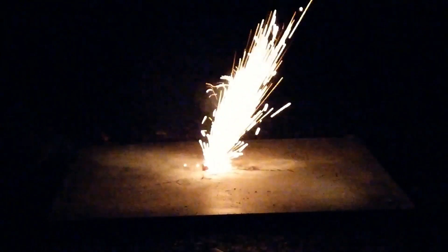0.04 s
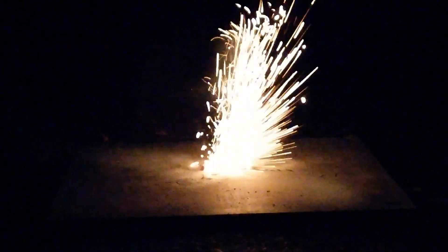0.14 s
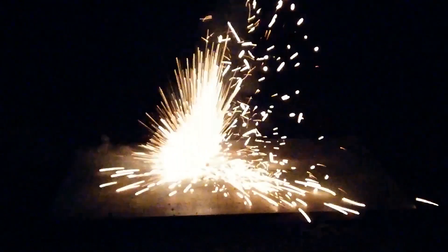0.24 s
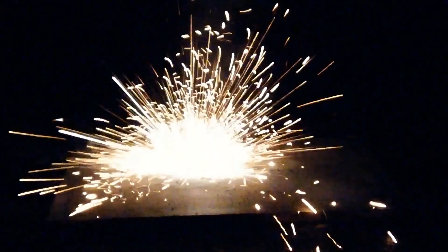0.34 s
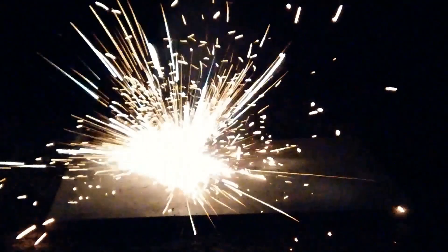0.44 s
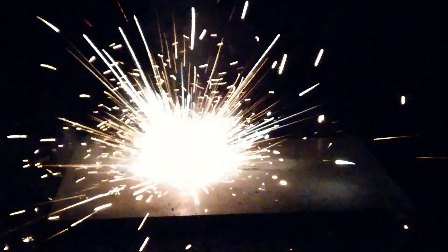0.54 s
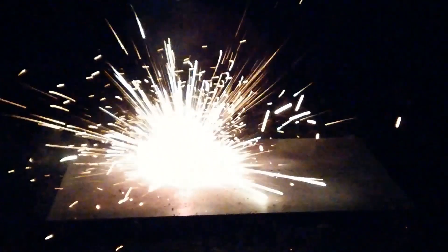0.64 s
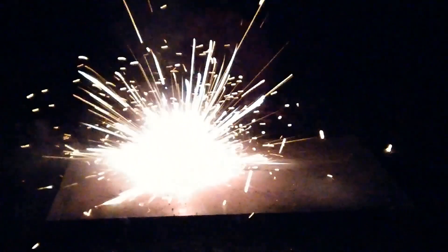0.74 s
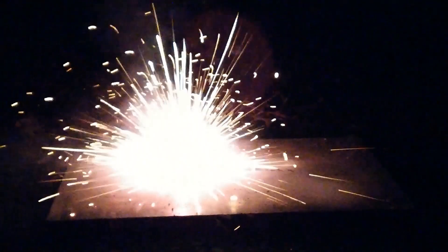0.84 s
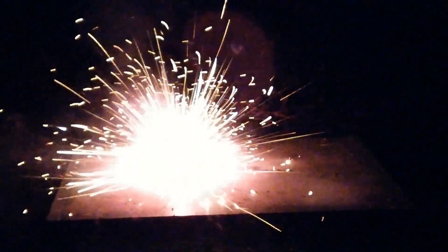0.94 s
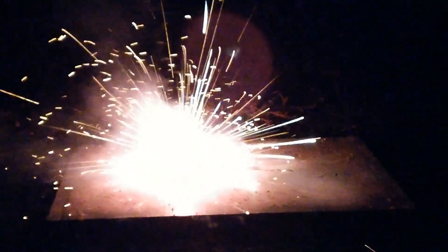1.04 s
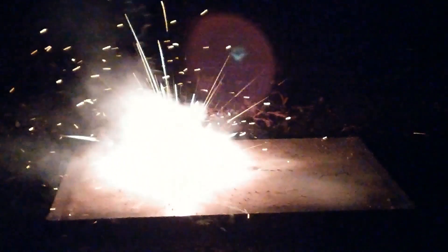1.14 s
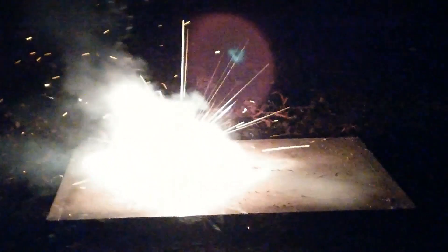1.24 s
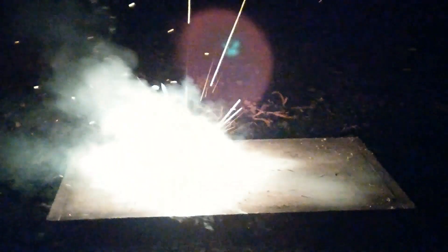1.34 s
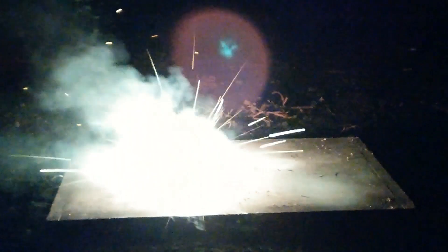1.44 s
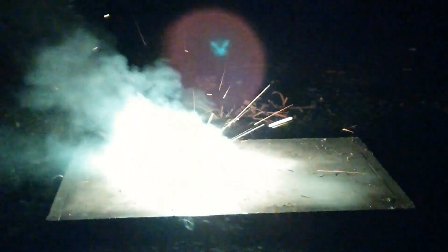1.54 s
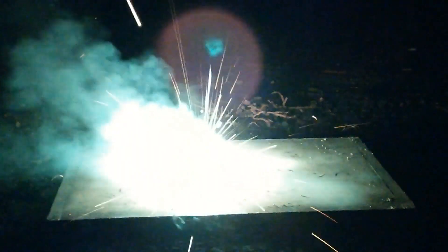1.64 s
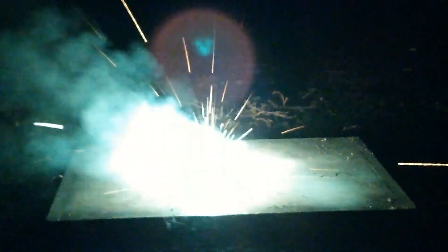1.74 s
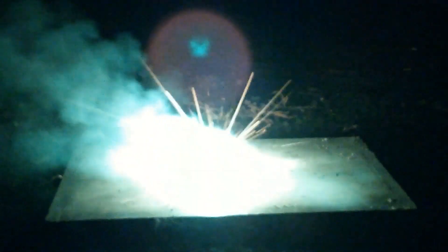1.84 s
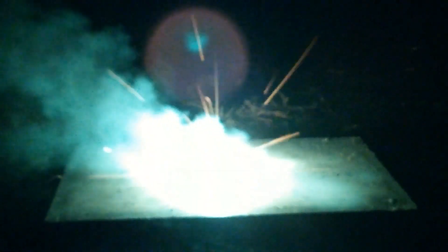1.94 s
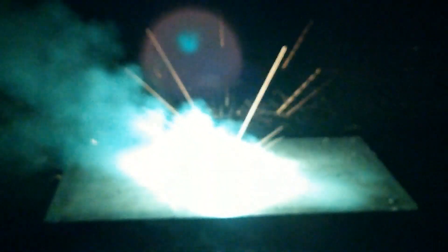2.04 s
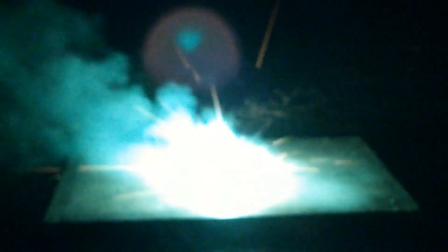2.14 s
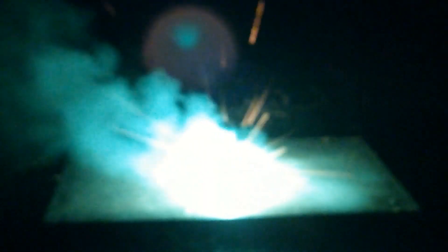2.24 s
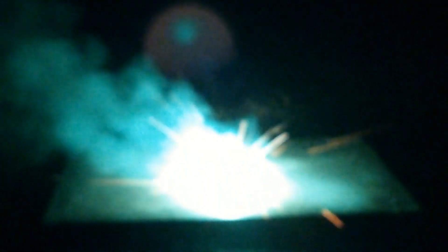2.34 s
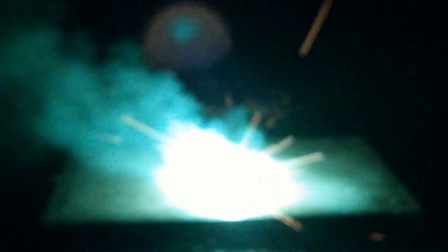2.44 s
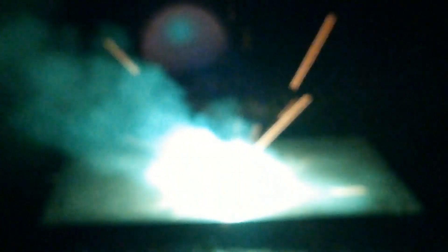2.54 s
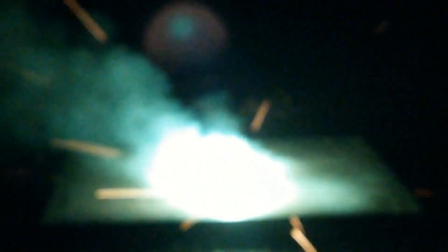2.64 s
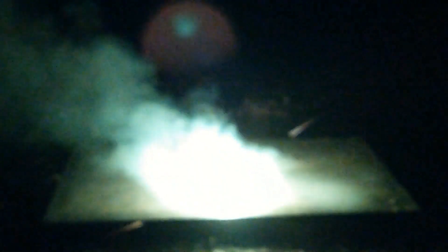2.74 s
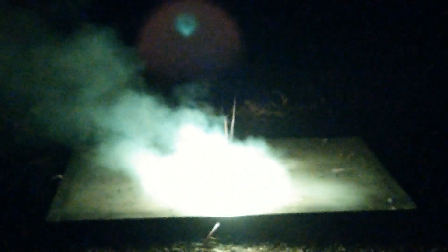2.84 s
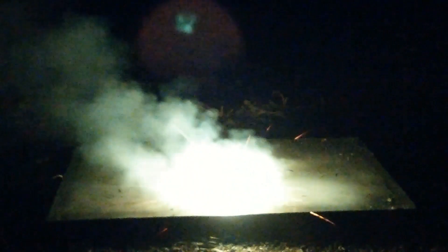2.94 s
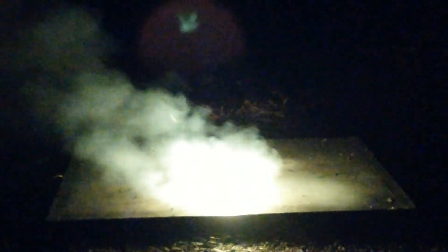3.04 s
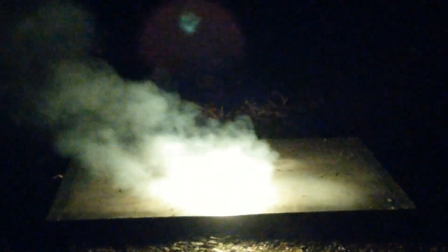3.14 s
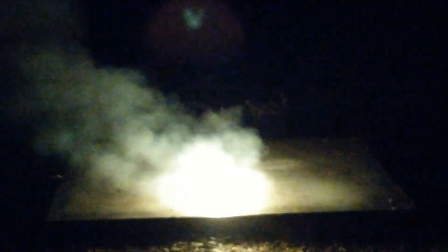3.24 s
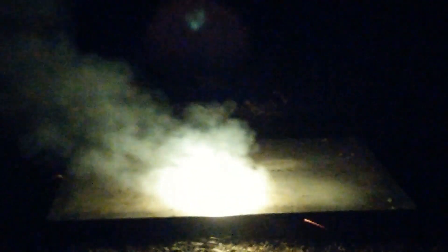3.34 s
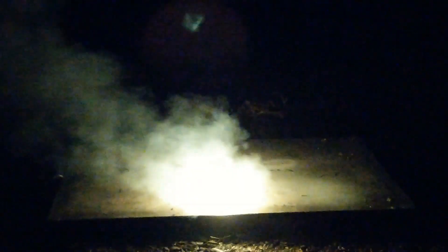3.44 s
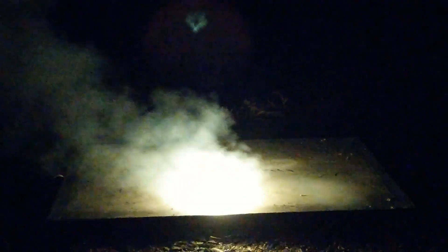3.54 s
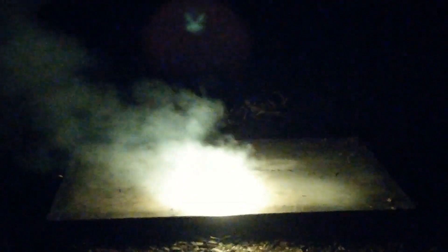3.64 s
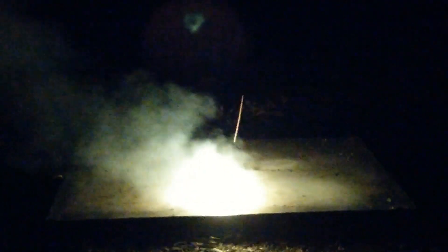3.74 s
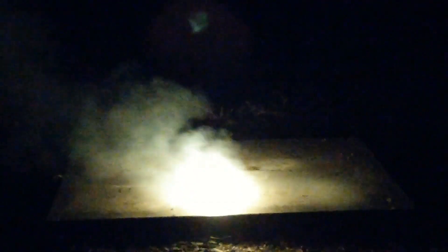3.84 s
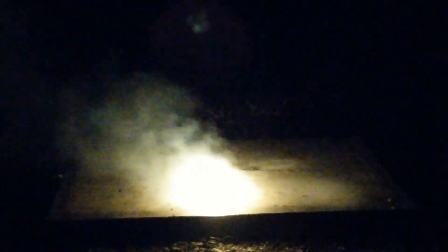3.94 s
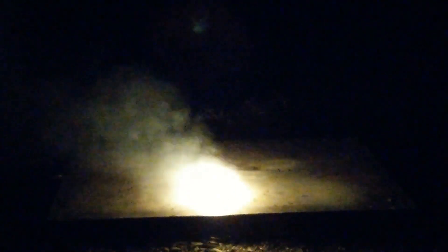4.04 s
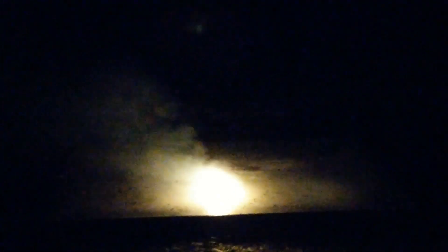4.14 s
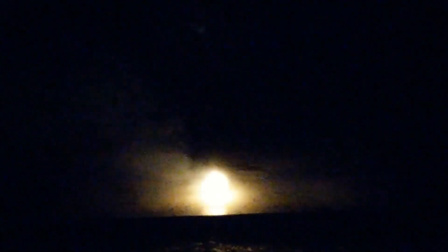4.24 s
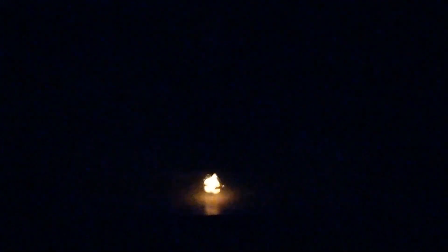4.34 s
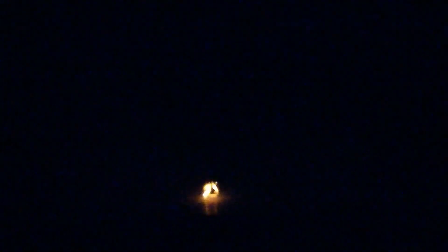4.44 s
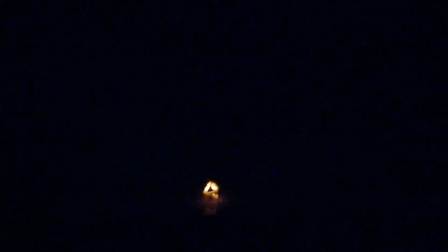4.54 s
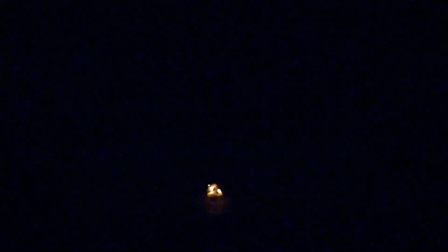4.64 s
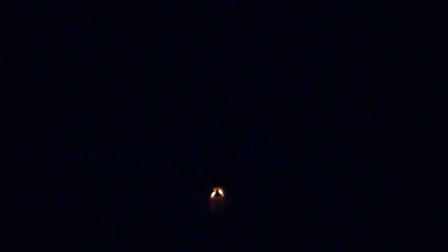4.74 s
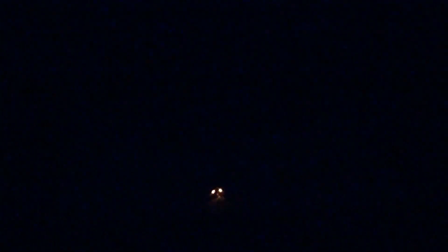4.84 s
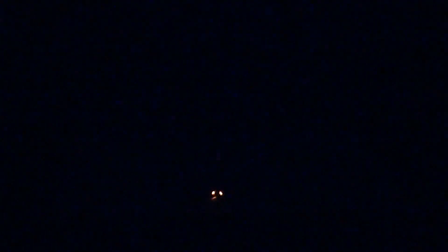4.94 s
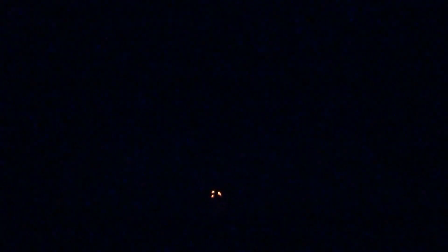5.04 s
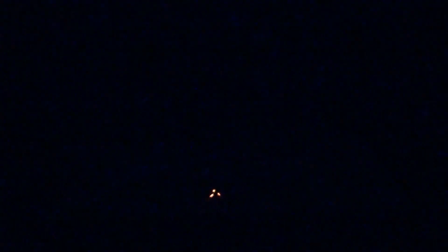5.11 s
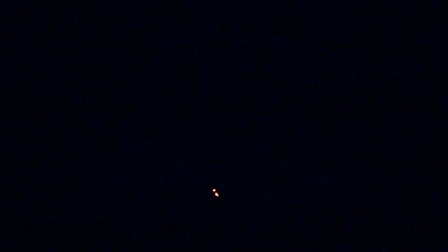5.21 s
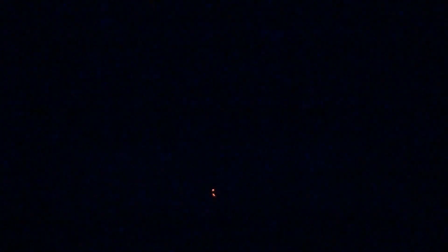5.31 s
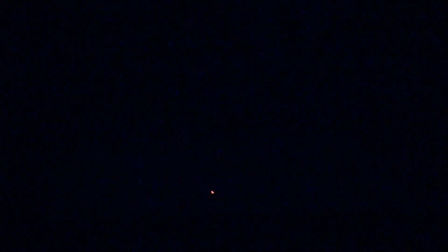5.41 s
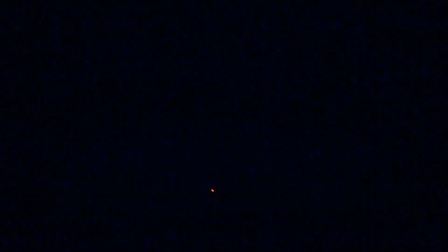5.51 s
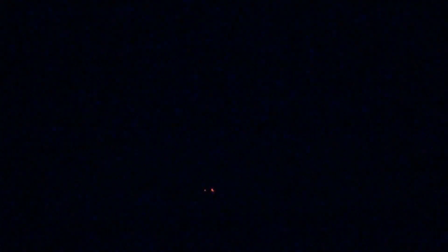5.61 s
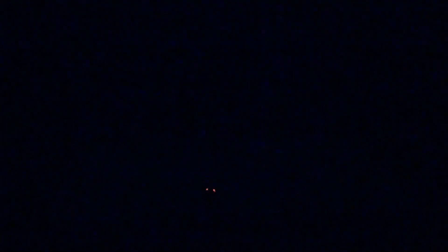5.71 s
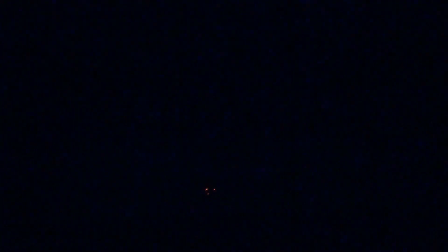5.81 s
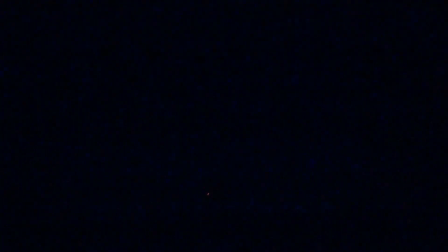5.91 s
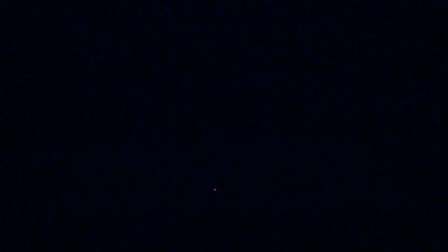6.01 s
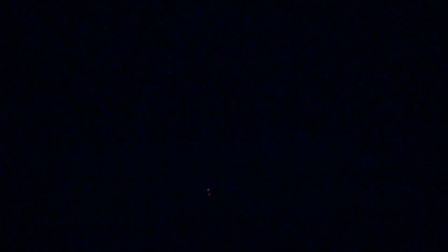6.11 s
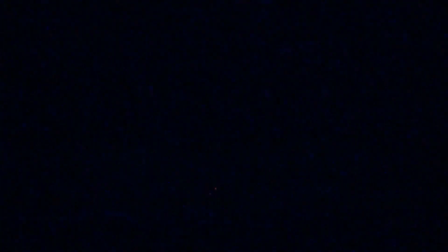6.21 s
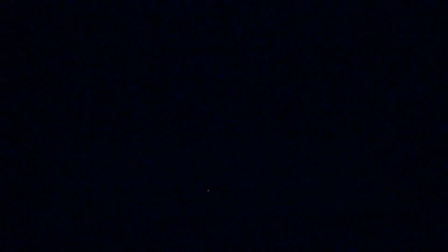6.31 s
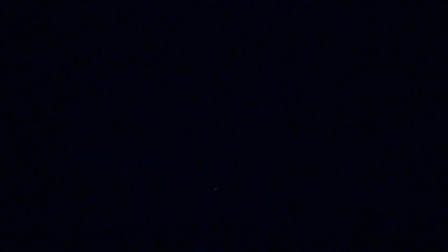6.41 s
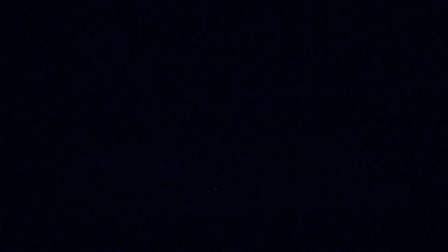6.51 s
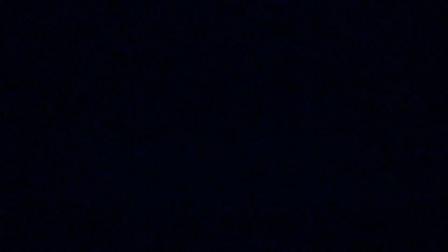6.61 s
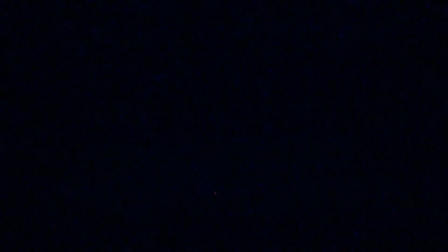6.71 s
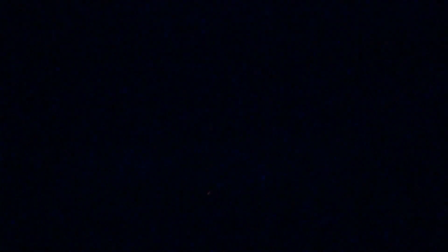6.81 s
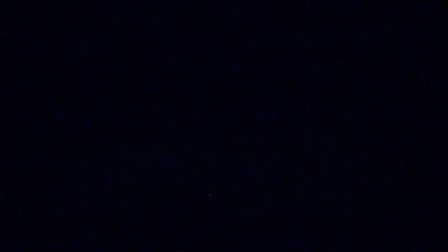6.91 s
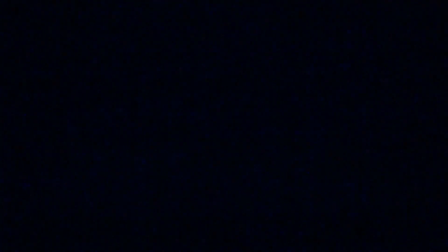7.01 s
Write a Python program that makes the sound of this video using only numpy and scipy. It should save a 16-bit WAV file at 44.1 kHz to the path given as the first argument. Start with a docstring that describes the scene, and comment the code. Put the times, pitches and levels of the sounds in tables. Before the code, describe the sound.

Harsh, bright firework hiss with a buzzing spin underneath burns briefly, cuts off, and leaves quick clicking taps on thin board in quiet night.

```python
"""Ground spinner firework on a board

Jets hiss and spit as a case on a thin board spins up outdoors at night: shaped, beating noise.
It hums at multiples of its turning rate (sines); after the flame the empty case keeps turning, taps
(noise clicks, decaying board modes) and rubs (noise through those modes).
Low rumble of changing level and microphone hiss lie under it, as shaped noise."""
import sys
import numpy as np
from scipy.fft import rfft, irfft, next_fast_len
from scipy.io import wavfile
from scipy.ndimage import map_coordinates

SR = 44100
rng = np.random.default_rng(int(sys.argv[2]) if len(sys.argv) > 2 else 0)


def put_to_file(sound):
    """Save the sound as 16-bit audio at rate SR, in the file named by the first command-line argument."""
    columns = np.atleast_2d(sound).T  # one column per channel
    safe = np.clip(columns, -1, 1)
    whole_steps = np.round(safe * 32767)
    wavfile.write(sys.argv[1], SR, whole_steps.astype(np.int16))


N = 311742

# turning case: t/s, rate/(turns/s), even-spin hum level/dB
SPIN = [(0.6, 17.6, -51), (0.83, 30.7, -38), (1.0, 41.5, -37), (1.17, 50.5, -33), (1.27, 54.9, -33),
        (1.4, 56.9, -33.5), (1.61, 58.1, -35), (1.94, 58.5, -33), (2.3, 56, -35), (2.73, 52, -35),
        (3.1, 47.4, -37), (3.5, 42.6, -41), (3.78, 39.8, -44), (4.09, 36.4, -46), (4.3, 35, -51),
        (4.47, 30, -64), (5.2, 25, -92)]
# lower board modes: f/Hz, relative level/dB, t60/s
BOARD_LOW_MODES = [(348, -5, 0.045), (594, -2, 0.09), (629.5, 8, 0.035), (800, 7, 0.042), (980, 3, 0.055),
                   (1250, 0, 0.06)]


def amp(db):
    """Gain of a level in dB."""
    return 10 ** (np.asarray(db) / 20)


def unit(x):
    """x scaled to rms 1."""
    return x / np.sqrt(np.mean(x ** 2) + 1e-20)


def along(points, hz):
    """(f/Hz, value) points interpolated on a log frequency axis."""
    f, v = np.transpose(points)
    return np.interp(np.log(hz + 1), np.log(f + 1), v)


def curves(rows):
    """One value per sample for each column after the time."""
    s, *cols = np.transpose(rows)
    return [np.interp(np.arange(N) / SR, s, c) for c in cols]


def bumps(rows):
    """Sum in dB of Gaussian swells and dips: t/s, rise/dB, length/s."""
    t = np.arange(N) / SR
    return sum(db * np.exp(-((t - s) / length_s) ** 2) for s, db, length_s in rows)


def wander(knots_hz):
    """Smooth random curve through normal knots at a given rate."""
    knots = rng.standard_normal(int(N * knots_hz / SR) + 4)
    return map_coordinates(knots, [np.arange(N) * knots_hz / SR])


def filtered(x, response):
    """x through a complex response of frequency, zero-padded."""
    m = next_fast_len(N + SR // 4)
    return irfft(rfft(x, m) * response(np.fft.rfftfreq(m, 1 / SR)), m)[..., :N]


def pair(likeness=1):
    """Two white noises; mid and side shares set their correlation by frequency."""
    # outdoor source at two ports: f/Hz, correlation before the likeness factor
    alike = [(40, .9), (300, .85), (900, 0.79), (2200, .72), (3300, 0.87), (6700, 0.87), (7900, .68),
             (9000, 0.55), (12000, .5)]

    def shares(hz):
        angle = np.arccos(np.clip(likeness * along(alike, hz), 0, 1)) / 2
        return np.array([np.cos(angle), np.sin(angle)])

    mid, side = filtered(rng.standard_normal((2, N)), shares)
    return np.array([mid + side, mid - side])


def coloured(x, spectrum):
    """x through an (f/Hz, level/dB) spectrum, at rms 1."""
    return unit(filtered(x, lambda hz: amp(along(spectrum, hz))))


def flame(turns_rad):
    """Jet noise: it spits, flares and beats as the nozzles sweep past."""
    # flame: t/s, hiss level/dB before the band changes, roar level/dB before the bass cut
    jet = [(0, -28.5, -45), (0.12, -26, -36), (0.27, -21.5, -31), (0.4, -15, -26), (0.6, -20, -26),
           (0.8, -18, -29.5), (1.12, -18, -31.5), (1.32, -19.5, -30.5), (1.5, -15.5, -30.5),
           (2.0, -13.5, -32), (2.4, -15, -34), (2.62, -14, -32.5), (3.1, -16.5, -32.5),
           (3.88, -17.5, -32.5), (4.15, -18, -31.5), (4.24, -20, -29.5), (4.4, -25, -31), (4.455, -27, -34),
           (4.51, -29.5, -45), (4.62, -31.5, -49), (4.9, -39, -53), (5.1, -55.5, -48), (5.4, -79, -86)]
    # flares as a slow jet faces the microphones, dips as it turns away: t/s, rise/dB, length/s
    flares = [(0.316, 5.5, 0.02), (0.369, -4.5, 0.016), (0.394, 4.5, 0.01), (0.41, 3.5, 0.0072),
              (0.434, -2.5, .006), (0.49, 2.5, 0.008), (0.527, -5, 0.0074), (0.558, 10, 0.0027),
              (0.569, -5, .004), (0.614, 2, 0.0026), (0.631, 12, 0.0023), (0.649, 7, 0.003),
              (0.672, 4, 0.0085), (0.698, 4, 0.0045), (.719, 3, 0.0034), (0.813, -1, 0.0035),
              (0.867, 3.5, 0.0048), (4.187, 4.5, 0.0082), (4.268, 3.5, .008), (4.39, 3.5, 0.013),
              (4.447, 7, .003)]
    # puffs in the roar as the burning lurches: t/s, rise/dB, length/s
    puffs = [(.169, 5, 0.015), (.31, 2, 0.012), (.852, 2, .015), (1.17, 3, .01), (1.333, 6, 0.0082),
             (1.45, 5, 0.021), (1.714, 2.5, 0.022), (2.055, -5.5, 0.027), (2.318, 5.5, 0.012),
             (2.636, 4, 0.0085), (2.888, 0.5, 0.011), (3.604, 4.5, .011), (4.27, 4.5, .01),
             (4.335, 1, 0.011), (4.405, 2, .02)]
    # beating by the sweeping jets: t/s, depth of order 3, depth of order 4
    sweep = [(.5, .2, .3), (.85, .3, .3), (2.2, .25, .22), (2.8, .09, .15), (4.1, .1, .18), (4.6, .25, .3)]
    # noise colours: f/Hz, relative level/dB per Hz
    hiss_colour = [(1000, -60), (2000, -28.5), (2600, -20), (3200, -13), (4000, -5), (4700, -2), (5500, 4),
                   (6200, 2.5), (6800, -4), (7600, -11), (8500, -17.5), (10000, -26), (12000, -33),
                   (15500, -42)]
    roar_colour = [(20, -34), (60, -3.5), (150, 2.5), (400, 2), (900, -0.5), (1400, 0), (2000, 1),
                   (3000, -3), (6000, -27)]
    # hiss band gains, under 4 kHz and over 9 kHz: t/s, extra level/dB
    body_gain = [(0, 6.5), (0.6, 13.5), (1.4, 12.5), (1.9, 6.5), (2.7, -2), (3.4, 3.5), (4.3, 5.5),
                 (4.8, 11)]
    sizzle_gain = [(0, -2.5), (0.4, 3.5), (1.25, 10.5), (1.9, 3.5), (3.7, 5), (4.3, -1.5), (4.7, -2)]
    sparks_per_s, spark_db, spark_spread_db = 150, 12, 2
    slow_burn_db, roar_flutter_db = 0.6, 1.1
    bass_hz, bass_start_db, bass_grows_s = 350, -8.5, 0.67
    roar_flare_share = 0.2

    t = np.arange(N) / SR
    hiss_db, roar_db = curves(jet)
    flare_db = bumps(flares)
    third, fourth = curves(sweep)
    beat = 1 + third * np.cos(3 * turns_rad) + fourth * np.cos(4 * turns_rad + 1)

    # uneven burning at several speeds; the fastest is the spitting of single grains
    spit_db = slow_burn_db * wander(6.59) + 0.61 * wander(45) + 0.7 * wander(180) + 0.19 * wander(900)
    # single grains crack in the jet
    spark_gain = amp(spark_db + spark_spread_db * rng.exponential(size=N))
    sparks = (rng.random(N) < sparks_per_s / SR) * spark_gain
    hiss = coloured((pair() + sparks) * beat * amp(spit_db), hiss_colour)
    body = filtered(hiss, lambda hz: 1 / (1 + (hz / 3900) ** 8))
    sizzle = filtered(hiss, lambda hz: 1 / (1 + (9000 / (hz + 1)) ** 8))
    sizzle_db = curves(sizzle_gain)[0] + 1.44 * wander(31.18)
    hiss += (amp(curves(body_gain)[0]) - 1) * body + (amp(sizzle_db) - 1) * sizzle

    flutter_db = 0.5 * spit_db + slow_burn_db * wander(15) + roar_flutter_db * wander(60)
    roar = coloured(pair() * amp(flutter_db), roar_colour)
    # the roar is thin until the case spins up
    bass = filtered(roar, lambda hz: 1 / (1 + (hz / bass_hz) ** 4))
    roar += (amp(bass_start_db * np.exp(-(t / bass_grows_s) ** 2)) - 1) * bass
    roar_db = roar_db + bumps(puffs) + roar_flare_share * flare_db
    return amp(hiss_db + flare_db) * hiss + amp(roar_db) * roar


def hum(turns_rad):
    """Rotating jets push the air a whole number of times each turn."""
    # level of the wobble hum: t/s, level/dB
    wobble_level = [(0.6, -56), (1.5, -48), (2.25, -47), (2.35, -42), (2.9, -44), (3.4, -46.5), (4.3, -45),
                    (4.5, -59), (5.2, -88)]
    # orders of the even spin and of the wobble: order, dB against the group level
    even_orders = [(4, 0.5), (8, -16), (7, -19)]
    wobble_orders = [(3, 1.5), (2, -12), (6, -2), (9, -6.5), (12, -6)]
    waver_db, even_blur_rad, wobble_blur_rad = 0.9, 0.28, 0.45

    groups = [(curves(SPIN)[1], even_orders, even_blur_rad),
              (curves(wobble_level)[0], wobble_orders, wobble_blur_rad)]
    total = np.zeros(N)
    for level_db, orders, blur_rad in groups:
        for order, db in orders:
            gain = amp(level_db + db + waver_db * wander(15))
            total += np.sqrt(2) * gain * np.sin(order * turns_rad + blur_rad * wander(24.7))
    return total


def knock_attack(t):
    """Exponential onset of a board knock, time constant 2.5 ms."""
    return 1 - np.exp(-t / 0.0025)


def ring(modes, t):
    """One blow on the board at both ports: decaying modes at new strengths, peak 1."""
    # each blow lands elsewhere
    level_scatter_db, pitch_scatter, phase_scatter_rad = 2.2, 0.013, 0.7
    # the wide board's upper modes reach the left port early, on average
    lead_rad, lead_full_hz = 0.75, 2000

    x = np.zeros((2, len(t)))
    for hz, db, t60_s in modes:
        gain = amp(db + rng.normal(0, level_scatter_db) - 60 * t / t60_s)
        phase = 2 * np.pi * hz * rng.normal(1, pitch_scatter) * t + rng.normal(0, phase_scatter_rad)
        lead = lead_rad * min(hz / lead_full_hz, 1) ** 4 * rng.normal(1, 0.86)
        x += gain * np.sin(phase + np.array([[lead], [0]]))
    x *= knock_attack(t)
    return x / np.abs(x).max()


def click(hz, t):
    """Short impact noise around a pitch, peak 1."""
    # click colour at the reference pitch: f/Hz, relative level/dB
    click_colour = [(2500, -32), (4500, 1), (5800, 9), (7500, -6.5), (10000, -15), (15500, -25)]
    reference_hz, t60_s, attack_s = 5880, 0.013, 0.00055

    colour = amp(along(click_colour, np.fft.rfftfreq(len(t), 1 / SR) * reference_hz / hz))
    a, b = irfft(rfft(rng.standard_normal((2, len(t)))) * colour, len(t))
    envelope = amp(-60 * t / t60_s) * (1 - np.exp(-t / attack_s))
    x = np.array([a + 0.25 * b, a - 0.56 * b]) * envelope
    return x / np.abs(x).max()


def faint_taps():
    """Faint taps, one at a random time in each of equal slots, as tap rows."""
    count, span_s, pitch_hz = 90, (4.5, 7.05), 5800
    # click, low knock, high knock, before the port gain
    level_db, scatter_db = (-50, -57.5, -60), (3, 2, 3)
    slots = (np.arange(count) + rng.random(count)) / count
    times_s = np.interp(slots, [0, 1], span_s)
    levels_db = level_db + rng.standard_normal((count, 3)) * scatter_db
    return [(s, tick, pitch_hz, low, high) for s, (tick, low, high) in zip(times_s, levels_db)]


def taps():
    """The spent case taps the board: a click, ringing modes and a noisy thud."""
    # clear taps: t/s, click level/dB, click f/Hz, low knock level/dB, high knock level/dB;
    # levels before the port gain
    clear_taps = [(4.4757, -30, 5510, -43.5, -42), (4.5837, -28, 5590, -43.5, -54),
                  (4.7182, -34, 6100, -43.5, -50), (4.9086, -38, 5300, -48, -49),
                  (4.9257, -39, 5660, -58, -64), (4.9849, -44, 5680, -43, -44.5),
                  (5.002, -31, 5530, -62, -55), (5.0156, -30, 5630, -64, -50),
                  (5.0692, -29, 6660, -48, -50), (5.0804, -31, 5220, -48, -51),
                  (5.0978, -35, 5800, -45, -50), (5.1492, -34, 5820, -39, -46),
                  (5.1874, -31.5, 5670, -41, -51), (5.2114, -43, 5930, -44, -61),
                  (5.2467, -37, 5710, -51, -44.5), (5.2706, -42, 6900, -37, -52),
                  (5.2954, -48, 5640, -40, -49), (5.3324, -42, 6160, -58, -56),
                  (5.3504, -47, 6410, -38, -39.5), (5.3676, -46, 5000, -37, -42),
                  (5.3833, -50, 5830, -41, -49), (5.439, -38, 6110, -53, -53), (5.451, -36, 5800, -50, -57),
                  (5.465, -27, 6300, -52, -48), (5.473, -36, 6000, -58, -60), (5.479, -22, 6680, -37, -43),
                  (5.5139, -34, 5380, -53, -63), (5.544, -37, 5300, -37.5, -53),
                  (5.5593, -23.5, 6770, -49, -62), (5.574, -39, 6590, -53, -60),
                  (5.5927, -33, 5740, -56, -64), (5.6231, -34, 5400, -40, -49),
                  (5.6544, -48, 5010, -47, -59), (5.681, -50, 5800, -57, -62), (5.707, -28, 5750, -53, -60),
                  (5.7248, -26, 6020, -39, -48), (5.748, -42, 5800, -49, -56),
                  (5.7743, -31, 5640, -38, -42), (5.8052, -36, 5980, -50, -52),
                  (5.8371, -49, 6630, -46, -63), (5.8594, -49, 6120, -40.5, -52),
                  (5.8794, -52, 6020, -52, -60), (5.892, -50, 5840, -47, -58),
                  (5.916, -29.5, 6960, -55, -63), (5.9389, -39, 6760, -59, -64),
                  (5.943, -52, 5800, -53, -61), (5.9638, -40, 5880, -51, -51),
                  (5.9845, -41, 5680, -57, -60), (5.993, -40, 6000, -58, -60),
                  (6.0102, -38, 6410, -49, -58), (6.0302, -30.5, 6140, -40, -46),
                  (6.0496, -38, 6300, -55, -46), (6.0667, -35, 5650, -41, -58),
                  (6.0883, -39, 6580, -44, -42), (6.1124, -44, 5670, -46, -53),
                  (6.1355, -45, 5810, -46, -50), (6.1561, -45, 6190, -44, -54),
                  (6.195, -50, 5800, -50, -60), (6.2061, -30.5, 6700, -47, -50),
                  (6.2257, -33, 5930, -50, -52), (6.2462, -38, 6100, -47, -57),
                  (6.257, -38, 6000, -59, -60), (6.2647, -28, 5200, -44, -53),
                  (6.2876, -27.5, 6250, -39, -38.5), (6.3184, -46, 5670, -44, -44),
                  (6.3455, -37, 5410, -48, -59), (6.364, -44, 5800, -54, -59),
                  (6.3804, -41, 5800, -44, -57), (6.4034, -49, 6100, -40, -56),
                  (6.4196, -38, 6180, -44, -59), (6.439, -41, 6100, -49, -58),
                  (6.4593, -33.5, 6050, -43, -44), (6.4829, -30, 5660, -40, -37.5),
                  (6.5056, -34, 5700, -43, -40), (6.5286, -28, 6000, -46, -42),
                  (6.552, -34, 6260, -47, -40.5), (6.575, -36, 5300, -44, -46),
                  (6.599, -24.5, 5850, -48, -38), (6.6045, -43, 7000, -60, -58),
                  (6.619, -34, 5500, -60, -58), (6.6243, -36, 6190, -46, -36),
                  (6.6501, -37, 5810, -55, -44), (6.6727, -35, 5230, -46, -40),
                  (6.6967, -33, 5710, -39, -36.5), (6.7211, -25.5, 5500, -39, -38),
                  (6.7255, -37, 6500, -58, -56), (6.7463, -30, 5730, -42, -39.5),
                  (6.773, -32, 5800, -40, -34.5), (6.7994, -41, 5130, -46, -43),
                  (6.8239, -30.5, 5750, -43, -41), (6.8501, -27, 5890, -37, -32),
                  (6.866, -40, 6000, -60, -41), (6.8777, -26, 5530, -38, -37),
                  (6.9077, -33, 5840, -41, -40), (6.9348, -23, 6260, -46, -36),
                  (6.9639, -30, 5890, -43, -38), (6.9922, -31, 5710, -44, -40.5),
                  (7.0186, -29, 5730, -43, -39), (7.045, -45, 5280, -55, -49)]
    # upper board modes: f/Hz, relative level/dB, t60/s
    high_modes = [(1250, -11, 0.055), (1513, -7, 0.045), (1860, -13, 0.027), (1976, -12, 0.028),
                  (2094, -13, 0.028), (2200, -18, .022), (2910, -24, .02), (3250, -20, 0.022),
                  (3860, -23, .02)]
    # thud colour: f/Hz, relative level/dB per Hz
    thud_colour = [(400, -12), (700, 6), (1500, 8), (2200, 5), (2600, -6), (3300, -4), (5000, -30)]
    # the opposed ports hide part of each sound: gain of click, low knock, high knock
    port_gain_db = (1.5, 18, 14)
    knock_lag_s, thud_db, thud_t60_s = 0.001, -6, 0.014  # thud level re high knock

    t = np.arange(SR // 12) / SR
    knocks, clicks = np.zeros((2, N + SR)), np.zeros((2, N + SR))
    thuds = np.zeros(N + SR)
    for s, click_db, hz, low_db, high_db in [*clear_taps, *faint_taps()]:
        click_db, low_db, high_db = np.add([click_db, low_db, high_db], port_gain_db)
        start = round(s * SR)
        clicks[:, start:start + len(t)] += amp(click_db) * click(hz, t)
        # the board answers a moment after the click
        start = round((s + knock_lag_s) * SR)
        at = slice(start, start + len(t))
        knocks[:, at] += amp(low_db) * ring(BOARD_LOW_MODES, t) + amp(high_db) * ring(high_modes, t)
        thuds[at] += amp(high_db + thud_db - 60 * t / thud_t60_s) * knock_attack(t)
    return knocks[:, :N] + thuds[:N] * coloured(pair(), thud_colour) + clicks[:, :N]


def rub():
    """The rim settles onto the board as thrust dies; friction noise drives its low modes."""
    level_db, from_s, rise_db, rise_s = -39, 4.03, 47, 0.39
    damping, top_hz = 2.6, 1480

    def board(f):
        modes = sum(amp(db) * 1j * f / t60_s / (hz * hz - f * f + 1j * f * damping / t60_s)
                    for hz, db, t60_s in BOARD_LOW_MODES)
        return modes / (1 + (f / top_hz) ** 6)

    since_s = np.arange(N) / SR - from_s
    rub_db = level_db - rise_db * np.exp(-np.clip(since_s, -1, None) / rise_s)
    return amp(rub_db + 2.8 * wander(70)) * unit(filtered(pair(), board))


def night():
    """Low rumble of changing level and the steady hiss of the microphones, as coloured noise."""
    # rumble level: t/s, level/dB
    rumble_level = [(0, -48), (1.2, -44), (2.2, -59), (4.6, -56), (5.0, -43.5), (5.35, -41), (5.5, -41),
                    (5.65, -39.5), (5.78, -40.5), (5.95, -38), (6.15, -44), (6.27, -41), (6.4, -45),
                    (6.5, -42.5), (6.7, -47.5), (7.07, -43)]
    # noise colours: f/Hz, relative level/dB per Hz
    rumble_colour = [(15, -26), (25, -5), (42, 1.5), (65, 6.5), (100, 1.5), (150, -6), (250, -10),
                     (500, -7.5), (1500, -77)]
    self_noise_colour = [(100, 9.5), (1500, 7), (3000, 5.5), (5500, 4.5), (7000, 0), (8500, -4),
                         (10000, -10.5), (15500, -14)]
    rumble = amp(curves(rumble_level)[0] + 2.2 * wander(9)) * coloured(pair(), rumble_colour)
    return rumble + amp(-49 + 0.57 * wander(30)) * coloured(pair(likeness=0.085), self_noise_colour)


def scene():
    """The spinner drifts a little, which shifts its arrival at the left port."""
    # wandering case: t/s, left lead/samples
    left_lead = [(0, .8), (1.4, .8), (2.2, 0), (3, 0), (3.7, .3), (5, .5)]
    turns_rad = 2 * np.pi * np.cumsum(curves(SPIN)[0]) / SR
    spinner = flame(turns_rad) + hum(turns_rad) + taps() + rub()
    read_at = np.arange(N) + curves(left_lead)[0]
    spinner[0] = map_coordinates(spinner[0], [read_at], order=5, mode="nearest")
    return spinner + night()


def record(dry):
    """Two ports nearly opposed in the bass and unlike in colour; soft peaks; band limit."""
    # left port against the right: f/Hz, gain/dB
    left_gain = [(30, 0), (60, -1.5), (150, -4), (500, -3.5), (900, -2.5), (1500, -1.5), (2200, 1),
                 (3600, 0), (4600, -3), (4950, -6), (5300, -9.5), (5600, -7.5), (6300, -5), (6700, -1),
                 (7200, 2), (10000, 1.5), (15000, 0)]
    # left port against the right: f/Hz, phase lag/rad
    left_lag = [(40, 3.5), (300, 3.3), (900, 2.8), (2200, 2.75), (3300, 3), (4900, 2.75), (5300, 2.2),
                (5600, 1.75), (6300, 1.2), (6700, 1), (7200, 1.3), (8900, 1.4), (10300, 1), (13000, 1.4)]
    ceiling, knee, top_hz = 0.9, 6, 15900

    def port_responses(hz):
        left = amp(along(left_gain, hz)) * np.exp(-1j * along(left_lag, hz))
        return np.array([left, np.ones(len(hz))])

    ports = filtered(dry, port_responses)
    ports = ports / (1 + np.abs(ports / ceiling) ** knee) ** (1 / knee)
    return filtered(ports, lambda hz: hz < top_hz)


dry = scene()
out = record(dry)
put_to_file(out)
```